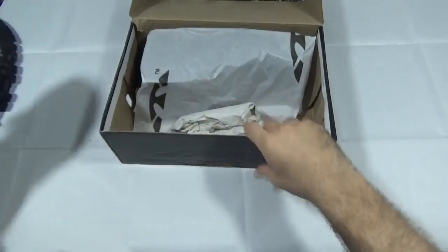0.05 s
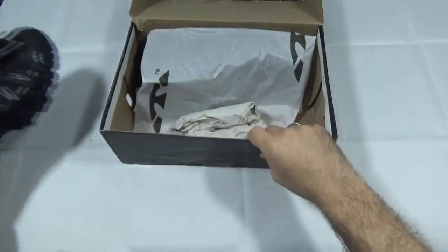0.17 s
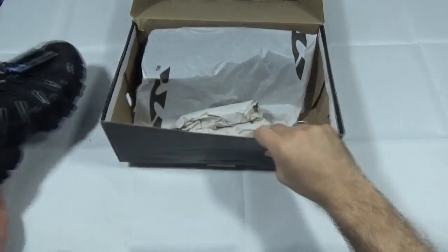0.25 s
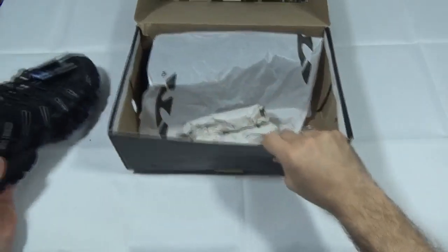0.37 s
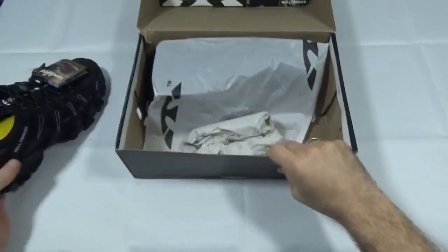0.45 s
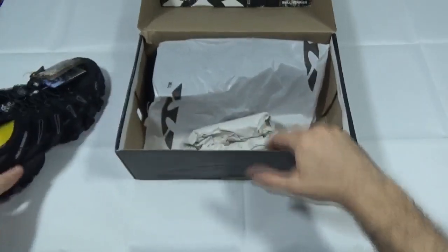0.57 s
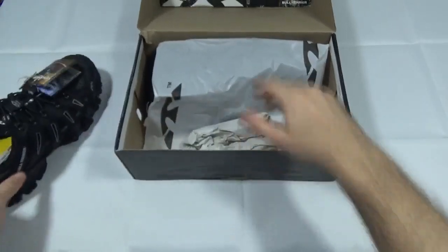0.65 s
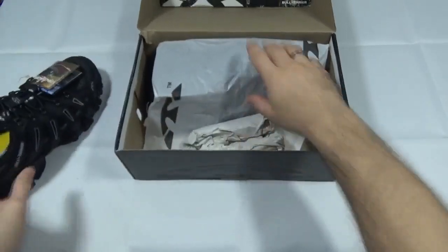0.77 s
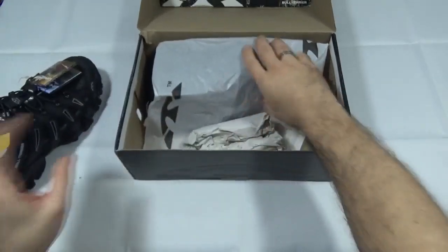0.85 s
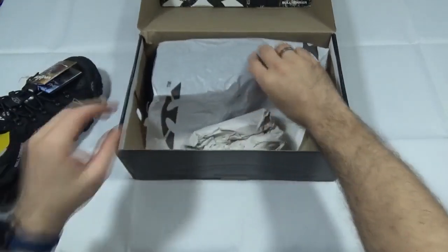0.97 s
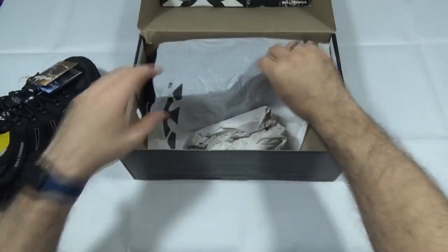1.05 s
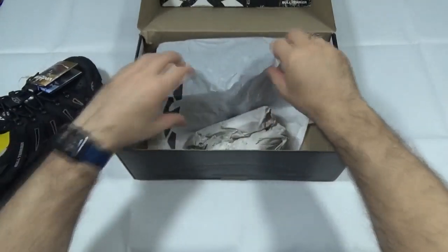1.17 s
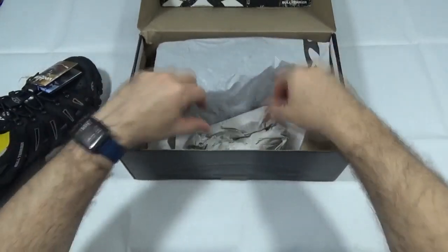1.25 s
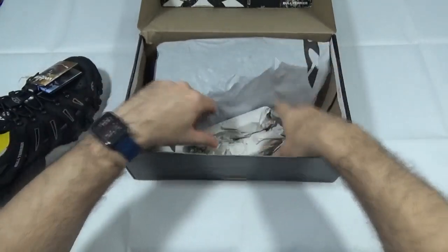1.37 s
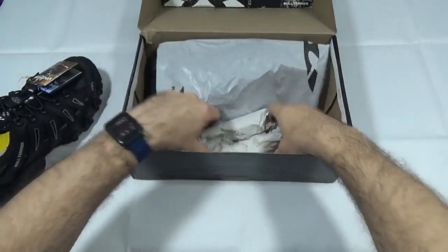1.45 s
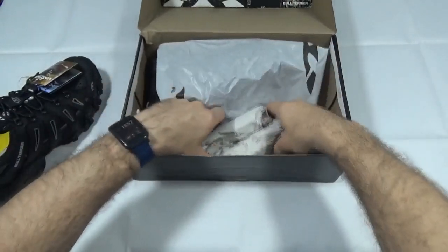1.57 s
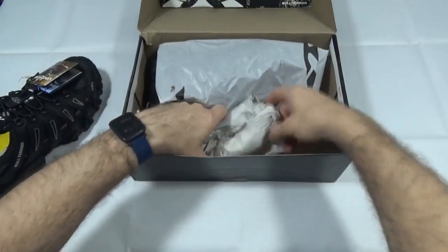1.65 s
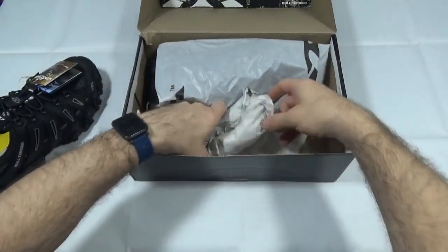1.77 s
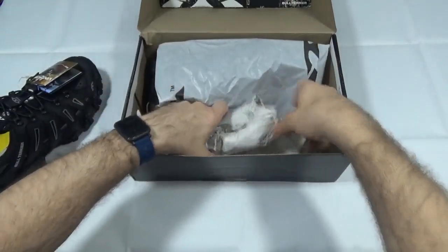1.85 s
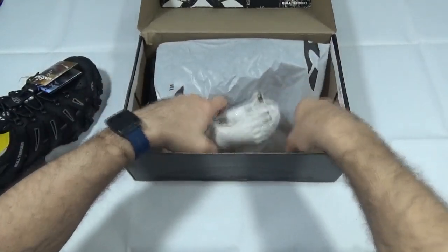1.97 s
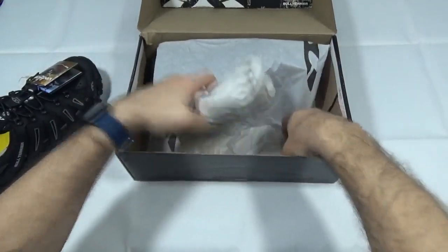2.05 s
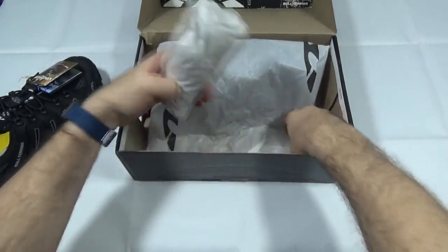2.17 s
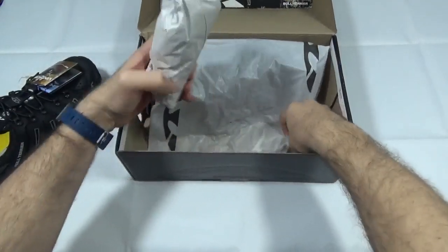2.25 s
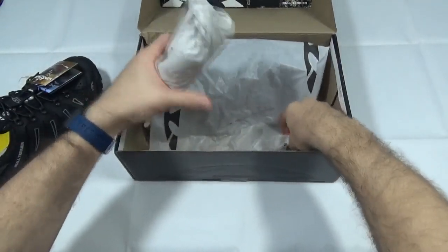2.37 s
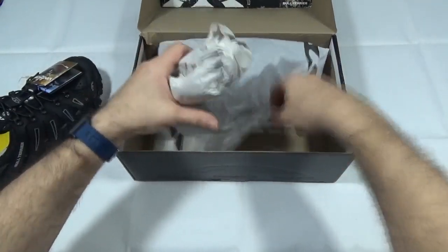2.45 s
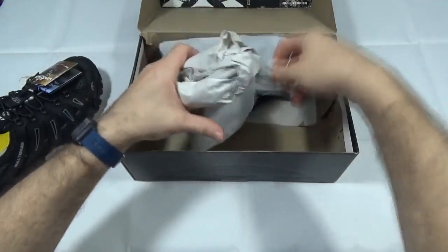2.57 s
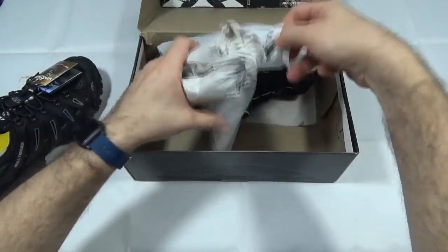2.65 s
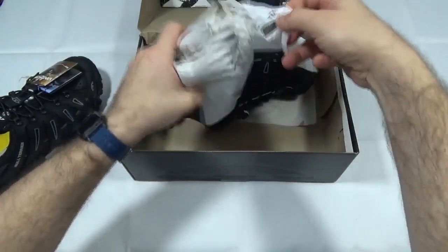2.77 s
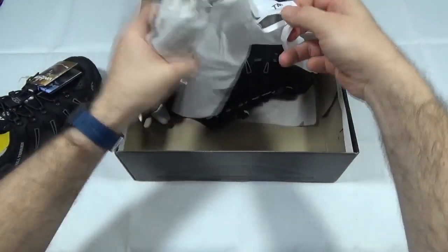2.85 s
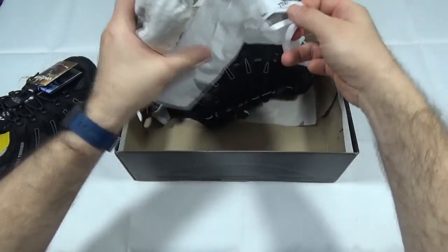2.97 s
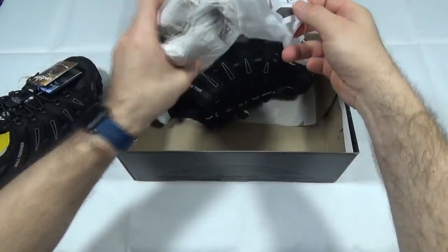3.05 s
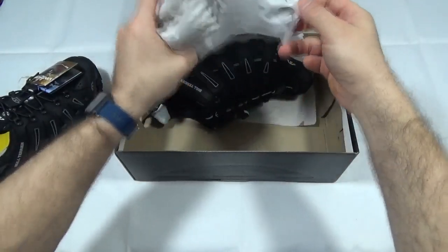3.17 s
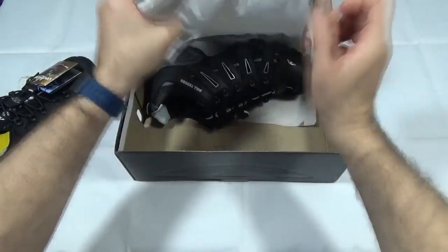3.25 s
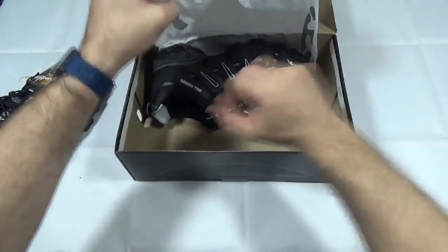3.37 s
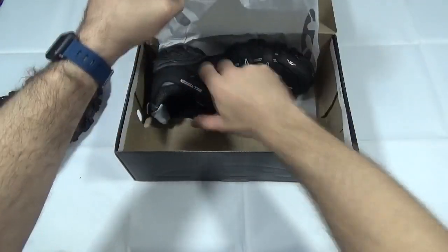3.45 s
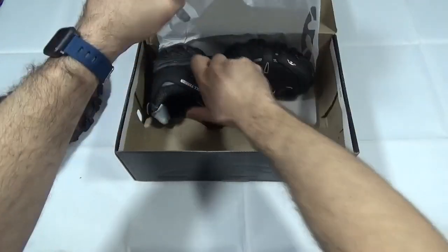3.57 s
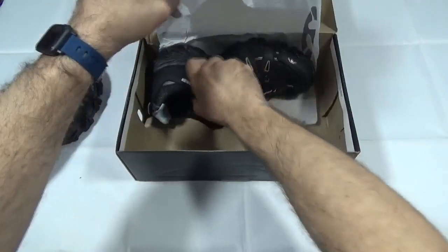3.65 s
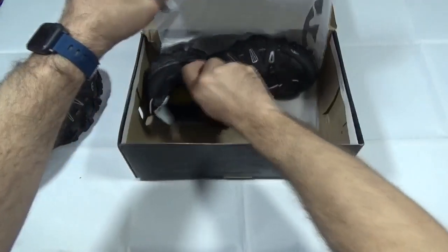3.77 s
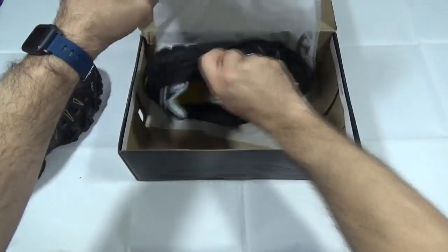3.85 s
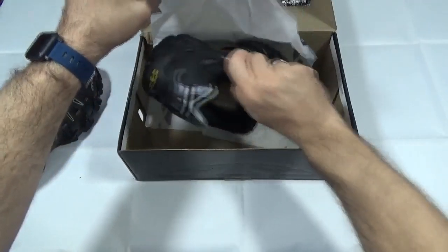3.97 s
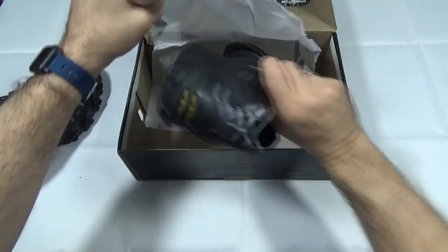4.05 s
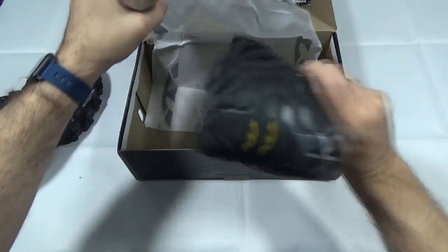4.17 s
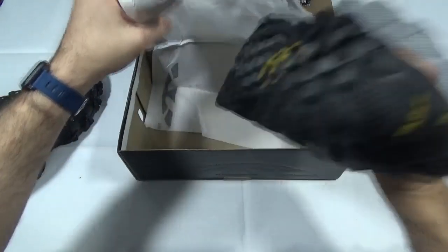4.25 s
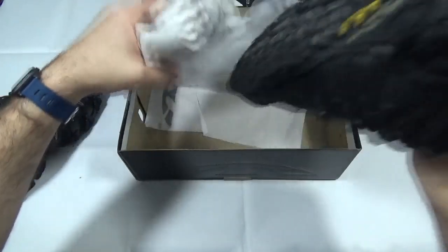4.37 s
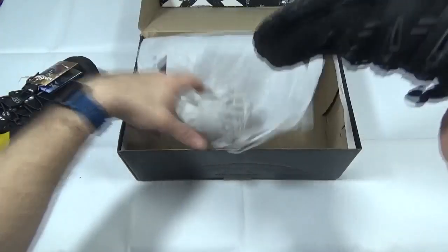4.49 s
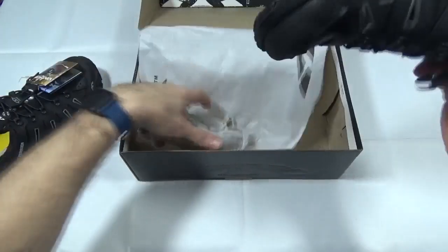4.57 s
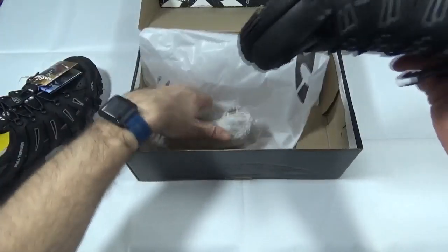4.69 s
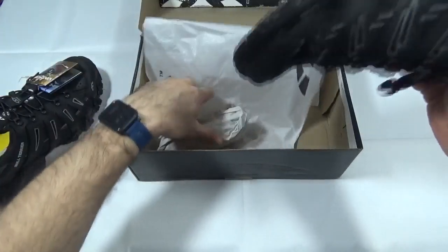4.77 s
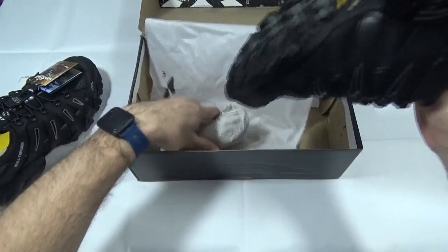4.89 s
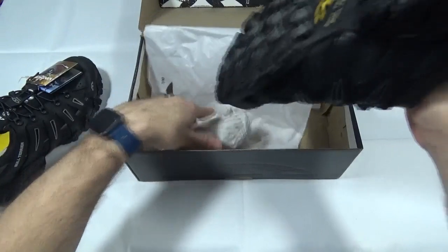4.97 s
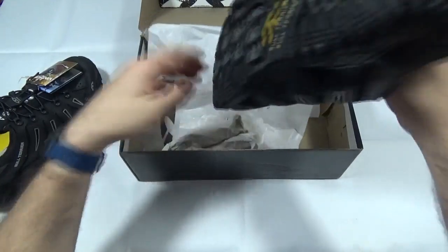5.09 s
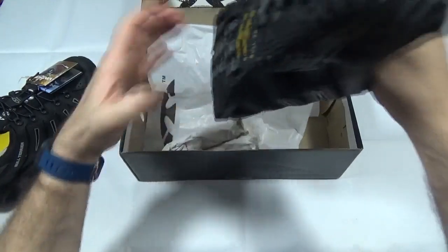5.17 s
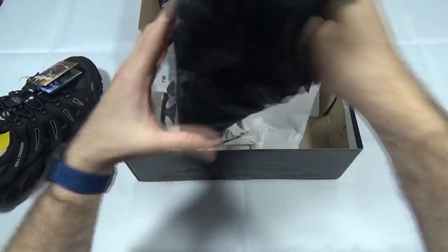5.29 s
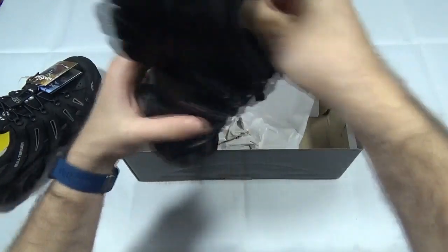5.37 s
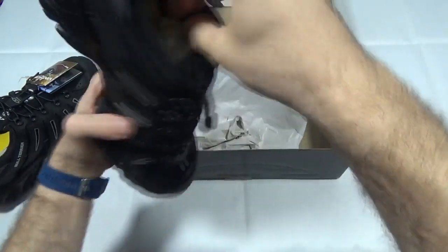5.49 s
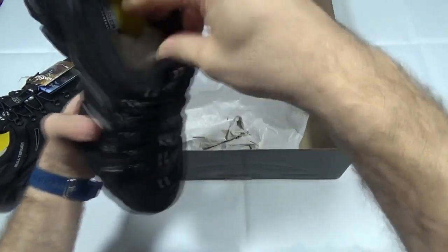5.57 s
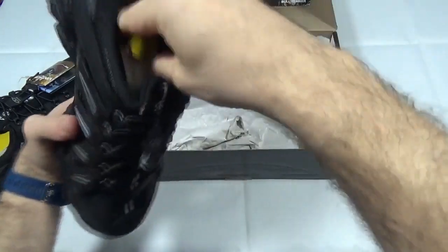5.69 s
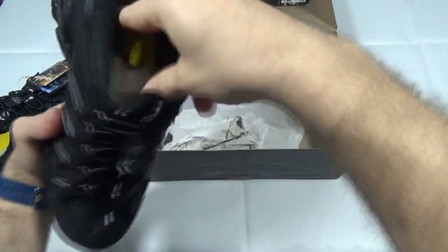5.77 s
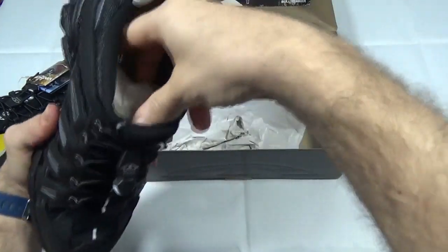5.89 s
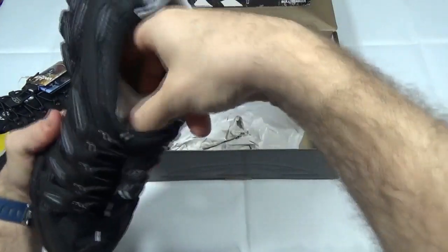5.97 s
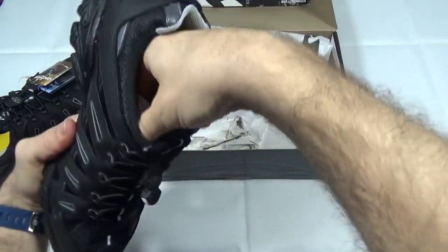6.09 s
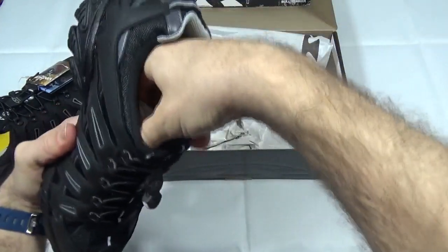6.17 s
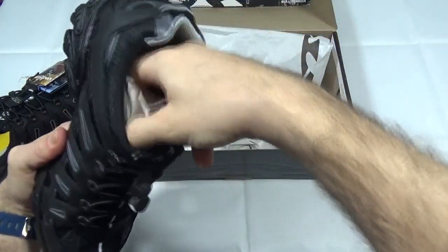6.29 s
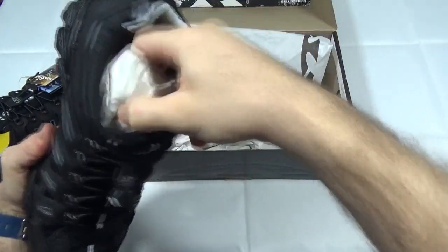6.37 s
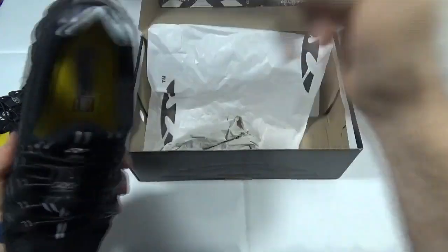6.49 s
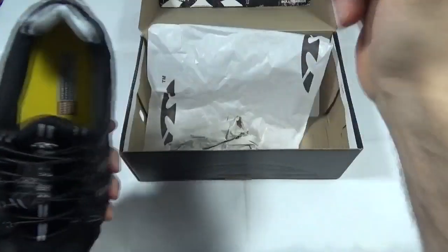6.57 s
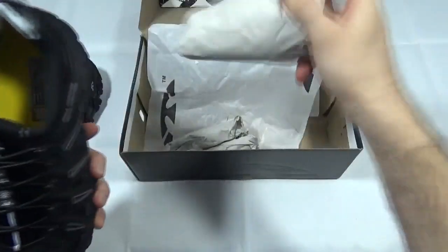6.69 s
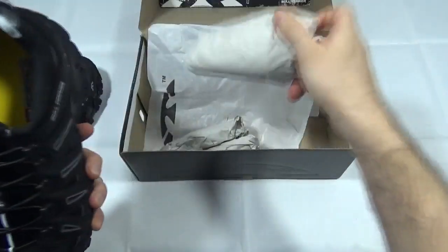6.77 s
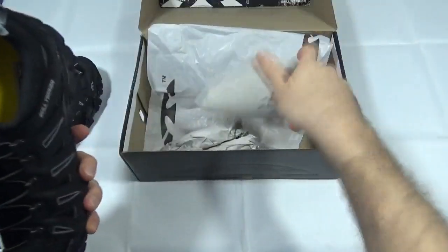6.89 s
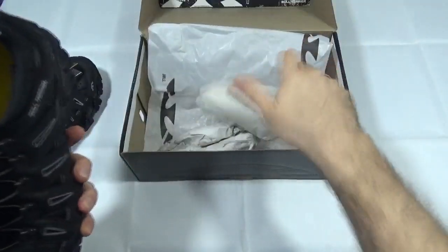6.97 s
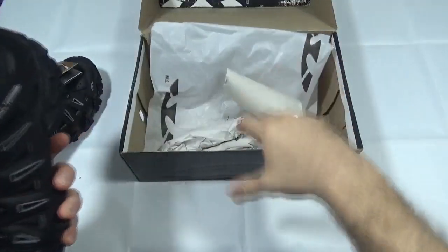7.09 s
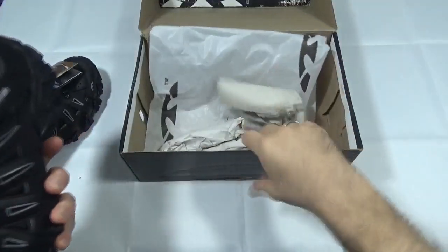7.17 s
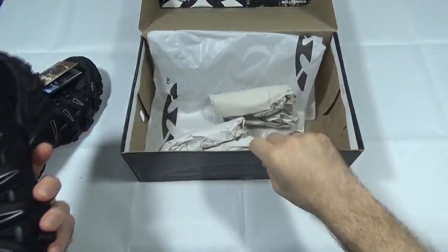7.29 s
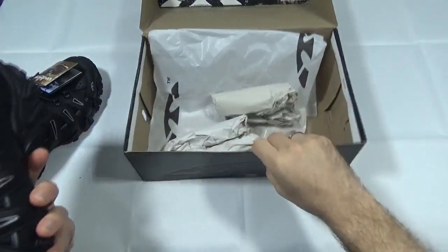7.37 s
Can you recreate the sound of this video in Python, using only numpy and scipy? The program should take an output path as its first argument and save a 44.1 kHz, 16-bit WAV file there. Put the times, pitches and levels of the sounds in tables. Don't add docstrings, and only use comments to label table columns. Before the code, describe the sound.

Dry, bright tissue crinkles in uneven clumps, with sharp fold snaps and tiny flicks over a sliding hiss. Hollow cardboard thumps sit underneath. The middle is dense and loud, then nearly stops; duller, tighter crackles come from paper inside a shoe before loose paper drops back into the box. Close indoor pickup, nearly centred, with faint room hiss.

```python
import sys
import numpy as np
from scipy import signal
from scipy.fft import rfft, irfft, next_fast_len
from scipy.io import wavfile
from scipy.ndimage import uniform_filter1d, minimum_filter1d, map_coordinates

SR = 44100
rng = np.random.default_rng(int(sys.argv[2]) if len(sys.argv) > 2 else 0)


def undo_db(level):
    steps = np.asarray(level, float) / 20
    return 10 ** steps


def generate_wav(sig):
    pcm = np.round(np.clip(np.atleast_2d(sig).T, -1, 1) * 32767).astype(np.int16)
    wavfile.write(sys.argv[1], SR, pcm)


N = 327751
T = np.arange(N) / SR
STEPS = np.arange(0, N / SR, 0.001)
SPLIT_HZ = 6400
FIRM_DB = -25


def unit(x):
    return x / np.sqrt(np.mean(x ** 2) + 1e-20)


def along(points, hz):
    f, v = np.transpose(points)
    return np.interp(np.log(hz + 1), np.log(f + 1), v)


def wobble(rate):
    knots = rng.standard_normal(1500 * 8)
    return map_coordinates(knots, [T * min(rate, 1500)])


def filtered(x, response):
    n = x.shape[-1]
    m = next_fast_len(n + SR // 2)
    spectrum = rfft(x, m) * response(np.fft.rfftfreq(m, 1 / SR))
    return irfft(spectrum, m)[..., :n]


def coloured(x, points):
    return filtered(x, lambda hz: undo_db(along(points, hz)))


def modes(table):
    def response(f):
        total = 0
        for k, (centre, width, db) in enumerate(table):
            ring = 1j * f * width / (centre * centre - f * f + 1j * f * width)
            total = total + (-1) ** k * undo_db(db) * ring
        return total
    return response


def effort(table):
    s, db, rise, hold, fall = np.transpose(table)[:, :, None]
    ms = 1000 * (STEPS - s)
    slopes = np.clip(-ms, 0, None) / np.abs(rise) + np.clip(ms - hold, 0, None) / np.abs(fall)
    return np.maximum((db - 20 * slopes).max(0), -100)


def hands(part):
    # full effort t/s, rustle level/dB, rise/ms, hold/ms, fall/ms
    grasps = [(.2, -46.5, 300, 60, 300), (.39, -37.5, 380, 11, 140), (.47, -43.5, 60, 24, 60),
              (0.805, -27.5, 8.9, 3.7, 41), (0.849, -25, 11, 146, 100), (1.308, -22.5, 3.1, 160, 19),
              (1.48, -29.5, 50, 130, 1500), (2.073, -28.5, 23, 56, 58), (2.21, -26, 136, 14, 110),
              (2.33, -31.5, 210, 32, 110), (2.419, -24, 113, 212, 260), (2.88, -36, 160, 104, 60),
              (2.993, -27, 11, 123, 270), (3.7, -23.5, 96, 159, 140), (3.96, -32.5, 86, 3, 243),
              (4.221, -30.5, 13, 10, 27), (4.258, -30, 10, 170, 50), (4.419, -22.5, 31, 135, 120),
              (4.7, -27, 220, 3.4, 154), (4.87, -31.5, 240, 13, 300), (5.132, -40.5, 11, 3, 73),
              (5.30, -45.5, 22, 37, 30), (5.352, -43.5, 30, 31, 5.8), (5.51, -39.5, 55, 5, 6.4),
              (6.888, -27.5, 5, 192, 110), (7.135, -26, 170, 77, 97), (7.28, -42, 100, 62, 60),
              (7.403, -26.5, 9, 6.5, 28), (7.392, -36.5, 20, 8, 20)]
    # full effort t/s, rustle level/dB, rise/ms, hold/ms, fall/ms
    rubs = [
        (0.586, -35, 15, 2.2, 95),
        (3.215, -25.5, 67, 3, 204),
        (3.5, -40, 390, 230, 59),
    ]
    # full effort t/s, rustle level/dB, rise/ms, hold/ms, fall/ms
    tugs = [
        (5.619, -37.5, 4.5, 21, 170),
        (5.69, -39, 99, 7.6, 250),
        (5.92, -35, 54, 10, 350),
        (6.12, -40, 150, 30, 100),
        (6.2, -31, 290, 30, 100),
        (6.33, -24.5, 260, 56, 144),
        (6.6, -36, 990, 9.1, 126),
        (6.828, -37.5, 130, 2.7, 54),
    ]
    # treble level at a firm grasp/dB, growth with effort [dB per dB]
    crisp = [(-25, 1.22), (-32, 1.05), (-27, 1.13)]
    # box drumming level at a firm grasp/dB, growth with effort [dB per dB]
    drumming = [(-40, 0.51), (-36, 0.4), (-38.5, 0.44)]
    # share of loose cracks at a firm grasp/dB, growth with effort [dB per dB]
    grainy = [(-23.5, 1), (-33, 1), (-29, 0.86)]
    laws = {"rustle": [(FIRM_DB, 1)] * 3, "treble": crisp, "drumming": drumming, "cracks": grainy}[part]
    power = 0
    for table, (db, grows) in zip((grasps, rubs, tugs), laws):
        power = power + undo_db(db + grows * (effort(table) - FIRM_DB)) ** 2
    return np.interp(T, STEPS, 10 * np.log10(power))


def cracks(s, db, hz, octaves, t60, crisp_db, spike, rise, size=512, lead=192):
    t, f = (np.arange(size) - lead) / SR, np.fft.rfftfreq(size, 1 / SR) + 1
    hump = np.exp(-0.5 * (np.log2(f / hz[:, None]) / octaves) ** 2) * (f < SPLIT_HZ)
    colour = hump + undo_db(crisp_db)[:, None] * (f >= SPLIT_HZ)
    noise = rng.standard_normal((len(s), size))
    swell = undo_db(60 * np.minimum(t, 0) / np.abs(rise)[..., None])
    decay = undo_db(-60 * np.abs(t) / t60[:, None])
    shape = np.where(t < 0, swell, decay)
    flip = undo_db(-60 * np.abs(t) / 0.00094) * (0.012 / t60[:, None]) * spike
    burst = irfft(rfft(noise * (shape + flip)) * colour, size) * signal.windows.tukey(size, 0.1)
    burst *= (undo_db(db) / np.abs(burst).max(1))[:, None]
    at = (s * SR).astype(int)[:, None] + np.arange(size)
    return np.bincount(at.ravel(), burst.ravel(), N + size)[lead:N + lead]


def patchy(x, patchy_db):
    z = signal.stft(x, nperseg=512)[2]
    field = uniform_filter1d(rng.standard_normal(z.shape), size=7, axis=0)
    field = uniform_filter1d(field, size=9, axis=1)
    return signal.istft(z * undo_db(patchy_db * unit(field)), nperseg=512)[1][:N]


def crinkle(count=6000):
    # f/Hz, level/dB per Hz
    paper = [(150, -24.5), (400, -6.5), (800, -3), (1600, 2), (5000, 1), (16000, -6.5)]
    rustle_db = hands("rustle")
    clumps_db = 0.52 * wobble(25) + 2 * wobble(80)
    when, size, pitch, length, top = rng.random((count, 5)).T
    size_db = np.minimum(-4.5 * np.log(1 - size), 12)
    small = cracks(when * T[-1], size_db, 600 * 2 ** (3.59 * pitch), 0.44, 0.014 + 0.0081 * length,
                   22 * top - 13, 2.2, np.array(0.007), size=384, lead=96)
    apart = np.minimum(undo_db(hands("cracks") - rustle_db), 1) / (1 + undo_db(rustle_db + 23.5))
    wash = np.sqrt(1.15 - apart ** 2) * rng.standard_normal(N)
    sheet = coloured(apart * unit(small) + wash, paper)
    sheet = patchy(sheet, patchy_db=2.4) * undo_db(clumps_db)
    low = filtered(sheet, lambda hz: hz < SPLIT_HZ)
    treble_db = hands("treble") + 0.5 + 0.72 * wobble(30)
    return undo_db(rustle_db) * unit(low) + undo_db(treble_db) * unit(sheet - low)


def snaps():
    # t/s, peak level/dB, centre f/Hz, t60/s
    crisp_folds = [(.822, -7, 2710, .011), (1.474, -4, 4690, 0.0086), (1.495, -4.5, 2230, 0.017),
                   (1.56, -6, 4530, 0.031), (2.0765, -13, 4500, 0.032), (2.0824, -6, 3750, 0.013),
                   (2.1229, -6.5, 3410, 0.044), (2.2387, 0, 3000, 0.011), (2.2724, -5, 4320, 0.0081),
                   (2.4068, -4, 3520, 0.016), (2.5678, 0.5, 3190, .014), (2.7881, -7, 3810, .014),
                   (2.8752, -5, 2670, 0.016), (2.995, -4, 3820, 0.015), (3.1118, -6, 3380, .016),
                   (3.216, -3.5, 2510, 0.019), (3.322, -9, 3130, 0.015), (3.3526, -13.5, 3020, 0.025),
                   (3.5954, -12, 3220, 0.0077), (3.6152, -16, 3090, 0.016), (4.2003, -15.5, 2880, 0.015),
                   (4.2229, -21, 2560, 0.015), (4.2587, -12, 3520, 0.014), (4.3297, -10, 4680, 0.012),
                   (4.55, -5, 2800, 0.017), (4.703, -4, 3110, 0.03), (4.7663, -8.5, 3160, .02),
                   (7.0643, -6, 3940, 0.015), (7.1391, -4.5, 3790, 0.025), (7.4062, -9, 2960, 0.01)]
    # t/s, peak level/dB, centre f/Hz, t60/s
    wad_folds = [(0.8095, -6, 4470, 0.024), (0.8658, -6.5, 4220, 0.042), (0.935, 1, 3240, .009),
                 (0.9992, -4.5, 3070, 0.033), (1.026, -8.5, 3560, 0.023), (1.459, 2, 2500, 0.0073),
                 (1.584, -7, 3370, 0.01), (1.621, -3.5, 3890, 0.016), (1.6914, -8, 4220, 0.0052),
                 (1.7493, -8, 2400, 0.011), (2.104, -4.5, 3550, 0.02), (2.1976, -4, 4270, 0.038),
                 (2.22, 0.5, 3740, 0.011), (2.3464, -10, 3750, 0.012), (2.667, -0.5, 3170, 0.02),
                 (2.7305, -1, 2400, 0.028), (2.8232, -11, 3160, 0.044), (3.231, -8, 3500, 0.022),
                 (3.694, -9.5, 3840, 0.014), (4.167, -22, 4730, 0.012), (4.416, -7, 3600, 0.04),
                 (4.4528, 4, 3060, 0.0068), (4.53, -4.5, 3430, .021), (5.0318, -16.5, 3200, 0.061),
                 (5.132, -19.5, 4420, 0.012), (7.3374, -9, 3900, 0.0084), (6.8246, -7, 3000, 0.0062),
                 (6.8926, -8, 2460, 0.031), (6.9938, 0.5, 2920, 0.02), (7.1842, -6, 2310, 0.011)]
    # t/s, peak level/dB, centre f/Hz, t60/s
    muffled_folds = [(.077, -14, 1710, 0.026), (0.3587, -13, 2150, 0.021), (1.2918, -26.5, 1370, .037),
                     (1.309, -11, 5030, 0.019), (1.974, -8.5, 1090, 0.019), (1.9927, -10, 2360, 0.021),
                     (3.396, -12.5, 2100, 0.024), (5.2898, -22, 1630, 0.011), (5.621, -12, 2890, 0.0052),
                     (5.631, -10.5, 3900, .006), (5.725, -21, 3150, 0.0083), (5.9201, -14, 2240, 0.01),
                     (5.999, -19, 2000, 0.015), (6.0963, -11.5, 2030, 0.014), (6.1171, -12.5, 1190, 0.012),
                     (6.1424, -14, 1430, 0.063), (6.2415, -5.5, 1400, 0.014), (6.32, -2.5, 3680, 0.0066),
                     (6.3672, -6.5, 2300, 0.0105), (6.4041, -2, 3370, 0.0054), (6.412, 2.5, 3850, 0.0046),
                     (6.4387, -7, 1390, 0.018), (6.462, -5, 3250, 0.0066), (6.5278, -1.5, 2960, 0.0068),
                     (6.547, -10, 3580, 0.019), (6.6182, -11.5, 2600, 0.0083), (6.8543, -25, 3730, .018),
                     (5.7926, -7, 2300, 0.014), (3.098, -9.5, 1110, 0.019), (6.098, -20, 600, 0.024)]
    # treble share level/dB, hump width/octaves, rise over decay time [ratio]
    fold_kinds = [(0, 0.95, .6), (-6.5, 0.84, 0.45), (-18, 0.95, 0.34)]
    kinds = crisp_folds, wad_folds, muffled_folds
    s, db, hz, t60 = np.vstack(kinds).T
    crisp_db, octaves, rise = np.repeat(fold_kinds, [len(k) for k in kinds], axis=0).T
    life = np.clip(t60, 0.003, 0.06)
    return cracks(s, db - 0.5, hz, octaves[:, None], life, crisp_db, 1.9, rise * t60, size=1024)


def tips():
    # t/s, treble peak level/dB, body level under the treble/dB, t60/s
    early_flicks = [(0.024, -36, -12, 0.017), (0.1486, -38, -11, 0.015), (0.2658, -38, -6, 0.015),
                    (0.387, -35, -9, 0.015), (0.4474, -37, -5, 0.015), (0.4643, -30, -8, 0.015),
                    (0.5994, -36, -6, 0.015), (0.8844, -7, -10, 0.015), (0.9088, -9.5, -14, 0.015),
                    (0.9557, -14, -11, 0.015), (0.9706, -8, -2, 0.016), (1.3634, -12, -14, 0.015),
                    (1.5449, -11, -8, 0.015), (1.6524, -19, -12, 0.015), (1.6661, -9, -11, 0.015),
                    (1.6843, -15, -8, 0.015), (1.7195, -23, -13, 0.015), (1.7554, -14.5, -12, 0.014),
                    (1.7843, -22, -14, 0.015), (1.8103, -16, -11, 0.015), (1.8447, -17, -7, 0.015),
                    (1.9044, -19, -10, 0.019), (1.9197, -14.5, -12, 0.015), (2.177, -12, -14, 0.015),
                    (2.265, -14, -15, 0.014), (2.3096, -17, -14, 0.015), (2.386, -11, -11, 0.015),
                    (2.4533, -7.5, -4.5, 0.014), (2.5237, -12, -9, 0.013), (2.5895, -7, -11, 0.015),
                    (2.6564, -16, -9, 0.015), (2.7097, -16, -4, 0.015), (2.8973, -22, -16, 0.015),
                    (2.9272, -29, -11, 0.017), (2.9522, -23, -13, 0.015), (3.0483, -9, -3, 0.017),
                    (3.1403, -7.5, -15, 0.015), (3.2053, -13, -11, 0.015), (3.248, -13, -16, 0.015),
                    (3.2884, -18, -5, 0.015), (3.3169, -17, -9, 0.015), (3.3274, -14, -5, 0.017),
                    (3.457, -27, -4, 0.02), (3.5214, -27, -8, 0.015), (3.6508, -10, -7, 0.017)]
    # t/s, treble peak level/dB, body level under the treble/dB, t60/s
    late_flicks = [(3.7943, -7, -7, 0.015), (3.8244, -10, -12, 0.015), (3.8402, -6, -21, 0.022),
                   (3.8694, -10, -14, 0.015), (3.8994, -16, -10, 0.015), (3.9564, -22, -13, 0.015),
                   (3.9923, -23, -11, 0.015), (4.0941, -27, 0, 0.015), (4.123, -41, 2, 0.015),
                   (4.2104, -29, -17, 0.01), (4.2324, -17, -7, 0.013), (4.3044, -16, -4, 0.015),
                   (4.3174, -17, -19, 0.014), (4.3859, -14, -9, 0.015), (4.4744, -15, -11, 0.015),
                   (4.4986, -12, -8, 0.015), (4.5844, -20, -8, 0.015), (4.6324, -12, -14, 0.015),
                   (4.6493, -13, -8, 0.015), (4.7294, -18, -12, 0.015), (4.815, -23, -5, 0.015),
                   (4.889, -12.5, -8, 0.018), (4.9474, -28, -15, 0.014), (4.9564, -29, -11, 0.015),
                   (5.3785, -32, -6, 0.015), (5.5039, -34, -6, 0.015), (5.6994, -34, 3, 0.015),
                   (5.9494, -29, -7, 0.015), (6.0876, -18.5, -6, 0.022), (6.131, -23, -7, 0.015),
                   (6.4353, -21, -7, 0.012), (6.4724, -27, -2, 0.015), (6.768, -31, -3, 0.015),
                   (6.9486, -26, -8, 0.013), (6.9716, -11, -2, 0.015), (7.045, -13, -7, 0.013),
                   (7.0854, -19, -9, 0.015), (7.106, -16, -16, 0.013), (7.1144, -14, -11, 0.015),
                   (7.1327, -11, -11, 0.015), (7.158, -9, -9, 0.015), (7.1843, -16, -9, 0.015),
                   (7.1936, -16, -7, 0.015), (7.2044, -18, -12, 0.015), (7.2214, -20, -10, 0.015),
                   (7.2514, -22, -10, 0.015)]
    # t/s, peak level/dB, centre f/Hz, t60/s
    dull_creases = [(0.1022, -25, 1560, 0.012), (0.2204, -37, 4650, 0.01), (2.2947, -14, 2860, 0.014),
                    (5.3123, -30, 1360, 0.012), (5.3343, -32, 1265, 0.011), (5.3517, -29, 3570, 0.012),
                    (5.4765, -40, 1350, 0.012), (5.5029, -37, 3290, 0.012), (5.5892, -29, 1350, 0.013),
                    (5.6774, -21, 1260, 0.012), (5.6974, -23, 1480, 0.012), (5.8127, -24.5, 2800, 0.015),
                    (5.8954, -25, 1900, 0.01), (5.9883, -29, 2830, 0.013), (6.2083, -20, 1300, 0.012),
                    (6.3954, -18, 4810, 0.011), (6.4204, -13, 3530, 0.011), (6.5121, -17, 4000, 0.012),
                    (6.6049, -15.5, 1530, 0.012), (6.6473, -31, 1050, 0.012), (6.8049, -25, 1010, 0.01),
                    (7.3851, -20, 3960, 0.012)]
    s, db, body_db, t60 = np.vstack([early_flicks, late_flicks]).T
    life = np.clip(t60, 0.003, 0.06)
    flicks = cracks(s + 0.0012, db + 3, np.full(len(s), 3600.0), 0.7, life,
                    -body_db - 9, 1.1, 0.5 * life, size=1024)
    s, db, hz, t60 = np.transpose(dull_creases)
    life = np.clip(t60, 0.003, 0.06)
    dull = cracks(s + 0.0012, db + 0.5, hz, 0.69, life,
                  np.full(len(s), -22.0), 1.1, 0.42 * life, size=1024)
    return flicks + dull


def box():
    # t/s, peak level/dB, hardness/dB, t60/s, hollowness/dB
    thumps = [(0.075, -20, 10, 0.28, -14), (0.339, -16.5, -20, 1, -10.5), (0.58, -11.5, -15.5, 0.55, -13),
              (1.314, -15.5, 8, 1, -22.5), (1.971, -15.5, -10.5, 1, -14), (3.646, -13, -10, 0.28, 1),
              (3.662, -15, 4, 0.23, -4.5), (3.689, -20, -15, .3, -8), (5.02, -31, -11, 0.4, -14.5),
              (5.291, -28, -12, 0.18, -5), (5.479, -35, -11, 0.36, -4), (6.43, -21, -6, 0.2, -5),
              (7.305, -30, -11, .3, -24), (7.34, -35, -4, 0.26, -15), (6.143, -16, 12, 0.11, 3),
              (6.164, -18.5, 9, 0.15, 4), (6.886, -20, 7, 0.52, -2), (6.99, -19.5, 1, 0.34, -6)]
    # f/Hz, width/Hz, level/dB
    wall_modes = [(131.4, 15, -10), (189.4, 18, -1.5), (250, 100, -10.5), (319, 19, 1), (399, 46, -11),
                  (498, 23, -2), (683, 17, -5), (880, 71, -4)]
    # f/Hz, level/dB per Hz
    drum_colour = [(25, -19), (60, -21.5), (110, -17), (190, -13.5), (320, -4), (650, 0), (1000, -1),
                   (1500, -3), (2400, -24)]
    walls = modes(wall_modes)
    t, knocks = T[:SR // 2], np.zeros(N)
    for s, db, hard_db, t60, hollow_db in thumps:
        rattle = rng.standard_normal(len(t)) * (undo_db(-60 * t / 0.012) + 1.23 * undo_db(-60 * t / t60))
        push = 5 * undo_db(-0.4 * hard_db - 60 * t / 0.0034)
        cutoff = np.clip(1900 * undo_db(0.8 * hard_db), 300, 9000)
        blow = signal.sosfilt(signal.butter(2, cutoff, fs=SR, output="sos"), rattle + push)
        hollow = modes([(637, 108, 2 * hollow_db + 18.0)])

        def body(f):
            no_rumble = (1j * f / (120 + 1j * f)) ** 3
            return (walls(f) + hollow(f) + 0.096) * no_rumble

        knock = filtered(blow, body)[:len(t)]
        at = round(s * SR)
        knocks[at:at + len(t)] += (undo_db(db - 3.5) * knock / np.abs(knock).max())[:N - at]
    patter_db = 2.5 * wobble(25) + 3.5 * wobble(90)
    drum = coloured(rng.standard_normal(N) * undo_db(patter_db), drum_colour)
    drum = drum + 0.5 * filtered(drum, walls)
    return knocks + undo_db(hands("drumming") - 0.7) * unit(drum)


def drag():
    # t/s, level/dB, gap resonance f/Hz
    stroke = [
        (3.05, -58, 1066),
        (3.119, -35, 980),
        (3.222, -34, 880),
        (3.281, -36, 670),
        (3.52, -47.5, 691),
        (3.63, -56, 733),
    ]
    # f/Hz, width/Hz, level/dB
    lid_modes = [(2050, 200, -2), (2480, 120, -4), (3950, 150, -3), (4250, 120, -6)]
    s, db, hz = np.transpose(stroke)
    noise = rng.standard_normal((2, N))
    slow = filtered(noise[0], lambda f: 1 / (1 + (f / 45) ** 2))
    gap_hz = np.interp(T, s, hz) + 45 * wobble(120)
    gap = (0.98 + 0.37 * unit(slow)) * np.sin(2 * np.pi * np.cumsum(gap_hz) / SR)
    ring = modes(lid_modes)
    friction = unit(filtered(noise[1], lambda f: ring(f) + 0.11 * (f < SPLIT_HZ)))
    contact = np.clip((T - 3.24) / 0.26, 0, 1)
    inside = (T > s[0]) & (T < s[-1])
    return inside * undo_db(np.interp(T, s, db)) * (gap + contact * undo_db(7.5) * friction)


def echo(x, t60_share):
    # f/Hz, t60/s
    room = [(150, 1), (1000, 0.74), (5000, 0.36), (14000, 0.087)]
    hz, t, z = signal.stft(rng.standard_normal(SR // 2), SR, nperseg=256)
    fade = undo_db(-60 * t / (t60_share * along(room, hz)[:, None]))
    tail = signal.istft(z * fade, SR, nperseg=256)[1]
    return signal.fftconvolve(x, tail / np.linalg.norm(tail))[:N]


def room_tone():
    # f/Hz, level/dB per Hz
    air_colour = [(30, -27), (400, -13), (1400, -14.5), (2500, -10.5), (3900, -10.5), (5000, -13),
                  (15500, -24)]
    return undo_db(-52.5) * unit(coloured(rng.standard_normal(N), air_colour))


def scene():
    # f/Hz, side minus mid level/dB
    width = [(60, -16), (200, -15.5), (500, -10.5), (1200, -8), (3000, -14), (6000, -12.5), (9000, -19),
             (15000, -30)]
    near = crinkle() + snaps() + box() + drag() + tips()
    mid = near + undo_db(-16) * echo(near, 1.0) + room_tone()
    lead = np.imag(signal.hilbert(mid, next_fast_len(N)))[:N]
    side = coloured(0.66 * lead + 0.78 * wobble(68) * mid, width)
    return np.array([mid + side, mid - side])


def low_pass(x):
    return signal.sosfilt(signal.butter(12, 16970, fs=SR, output="sos"), x)


def record(dry):
    # f/Hz, level/dB
    mic = [(40, 2), (3000, -2), (5220, 0.5), (6450, -6), (8500, -2), (11300, 5), (14000, -1), (15400, -6),
           (15900, -5), (16100, -57)]
    x = coloured(dry, mic)
    level_db = 10 * np.log10(np.abs(uniform_filter1d(np.mean(x ** 2, 0), 200)) + 1e-9)
    coming_db = -minimum_filter1d(-level_db, size=701, origin=-350)
    duck_db = uniform_filter1d(np.clip(coming_db - level_db - 17, 0, 20), size=120)
    low = filtered(x, lambda hz: hz < 5000)
    x = low * undo_db(-0.3 * duck_db) + (x - low) * undo_db(-1.3 * duck_db)
    x = x / (1 + np.abs(x / 0.6) ** 6) ** (1 / 6)
    mix = filtered(x, lambda hz: hz < 16050)
    return low_pass(mix)


dry = scene()
out = record(dry)
generate_wav(out)
```